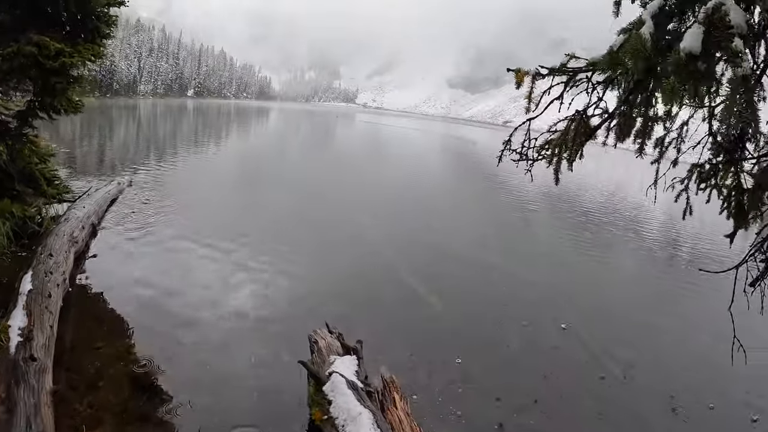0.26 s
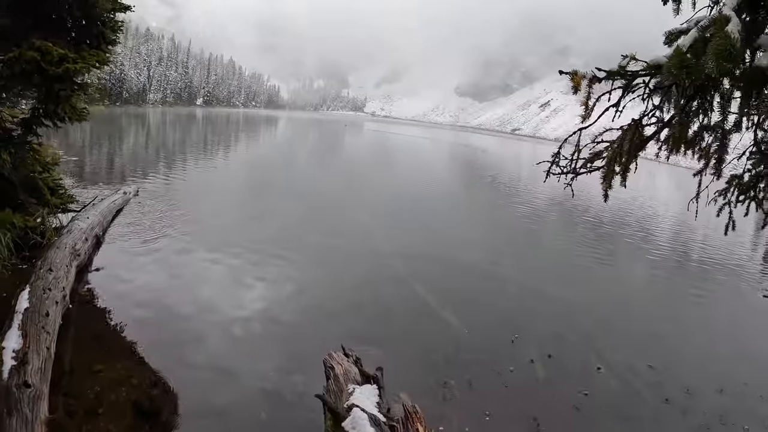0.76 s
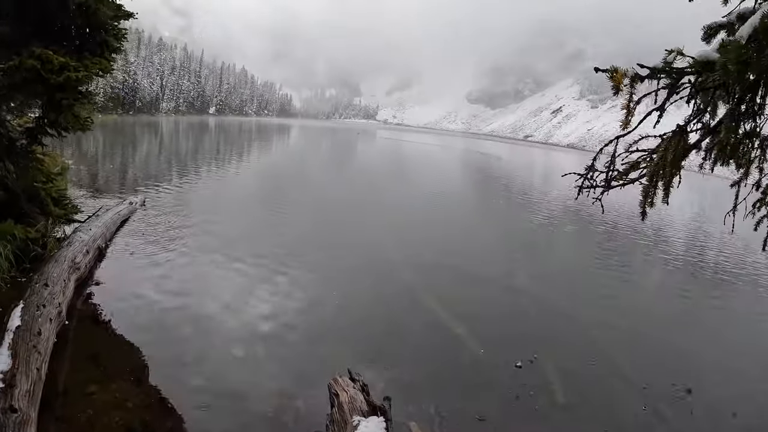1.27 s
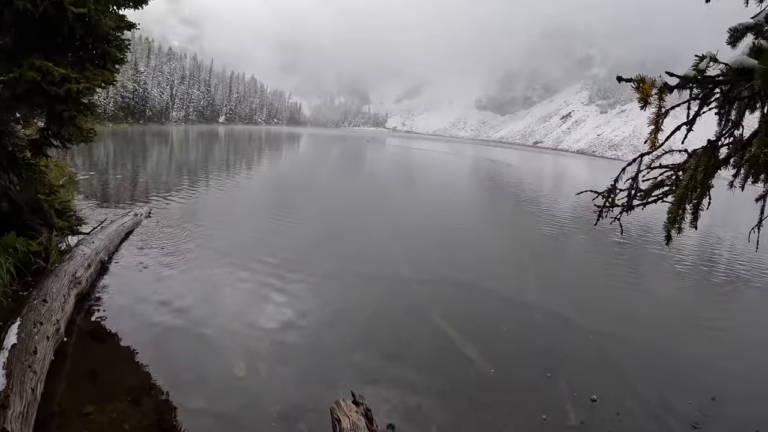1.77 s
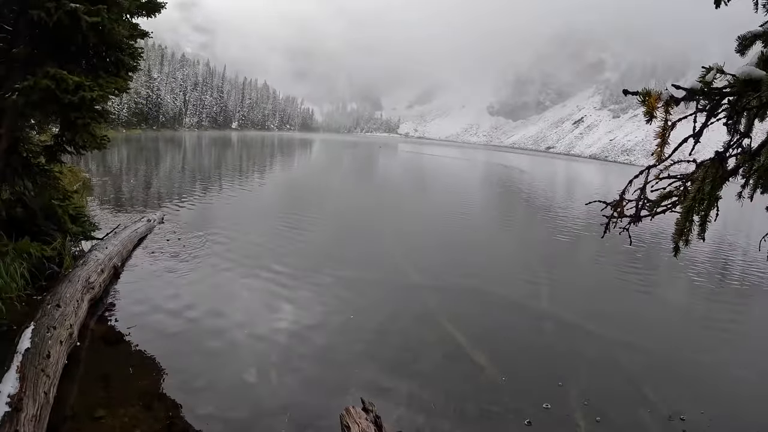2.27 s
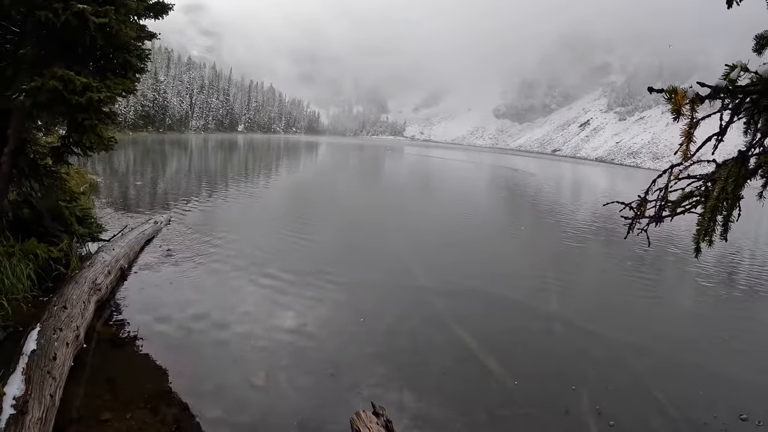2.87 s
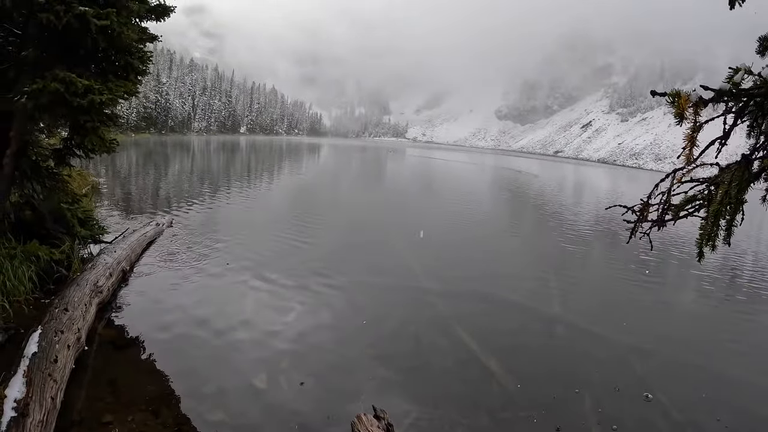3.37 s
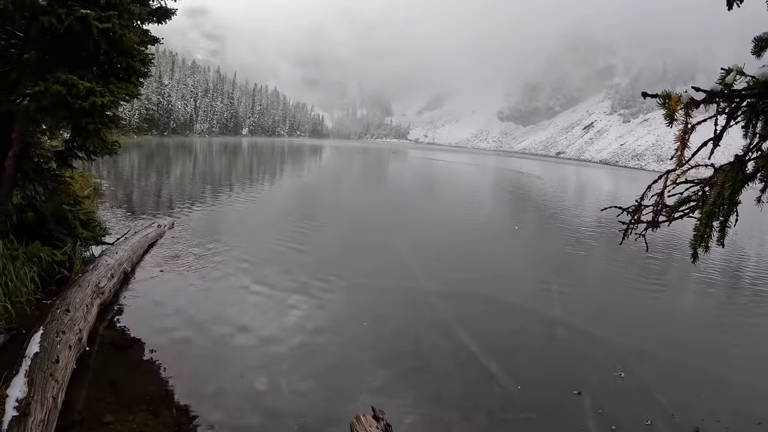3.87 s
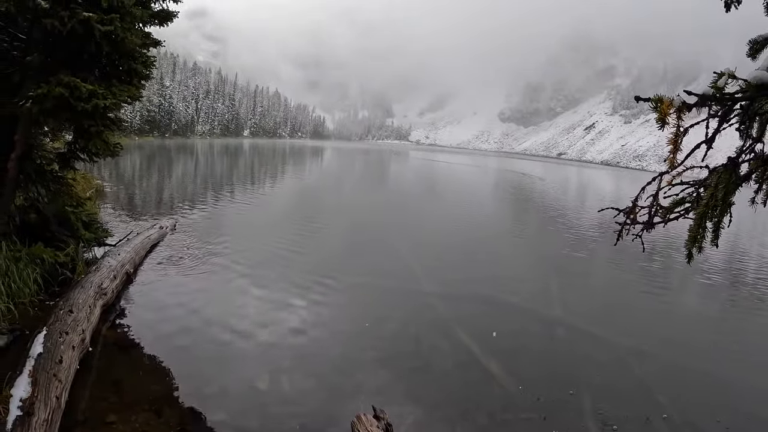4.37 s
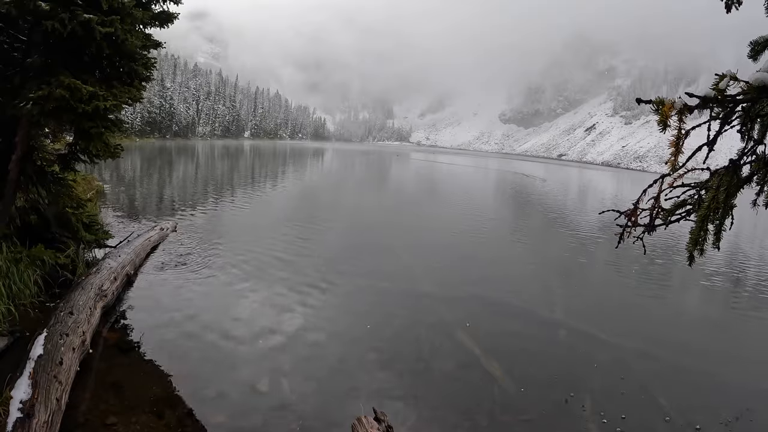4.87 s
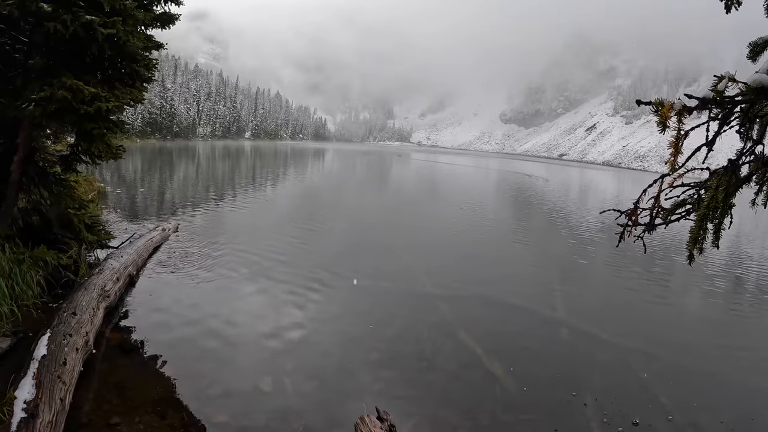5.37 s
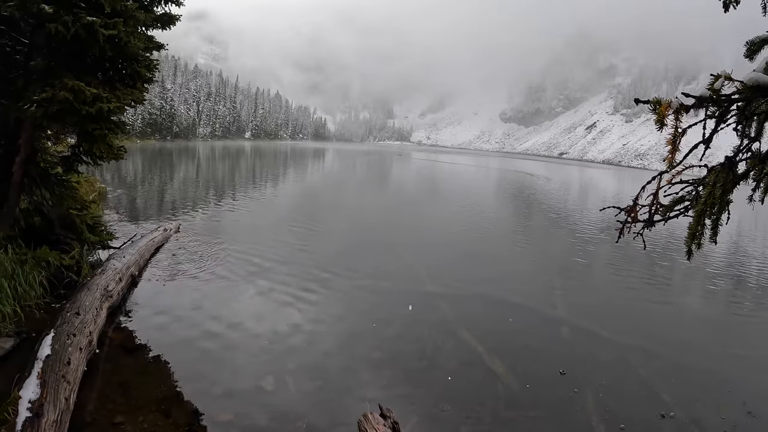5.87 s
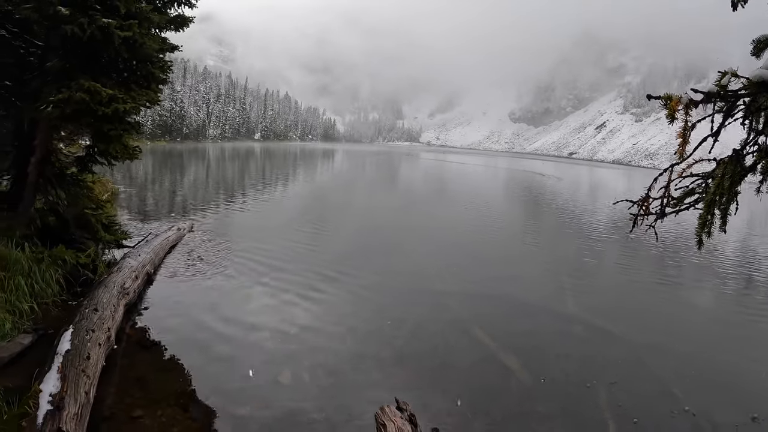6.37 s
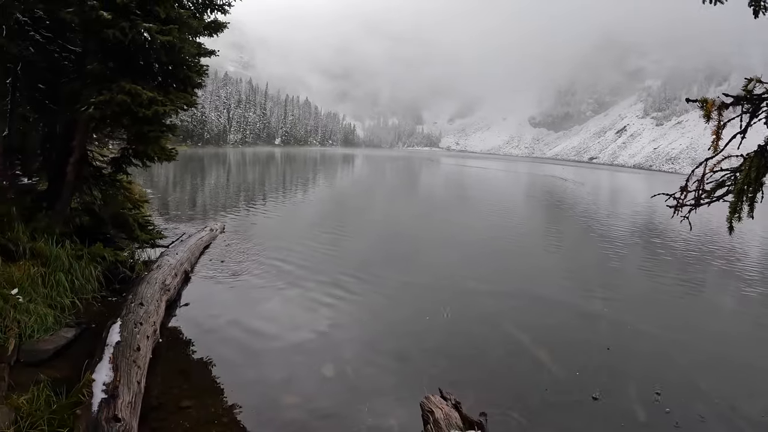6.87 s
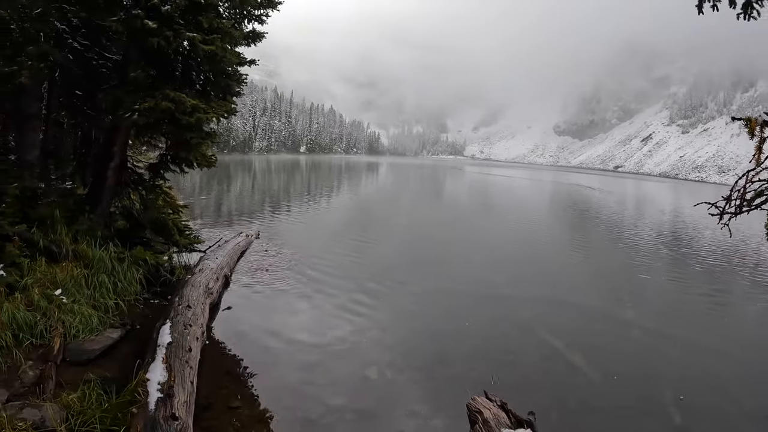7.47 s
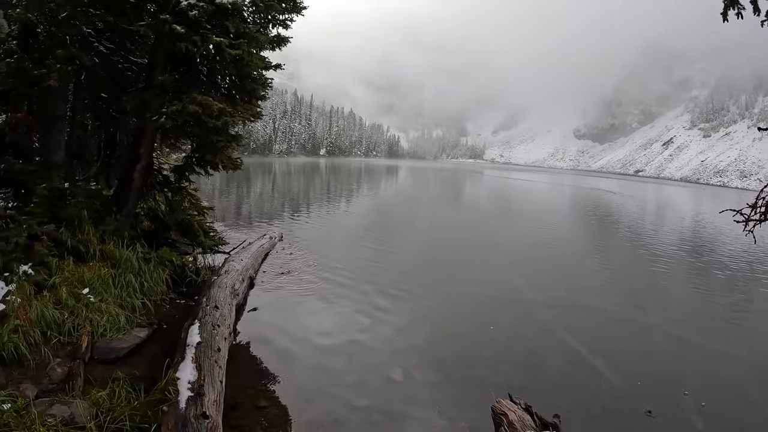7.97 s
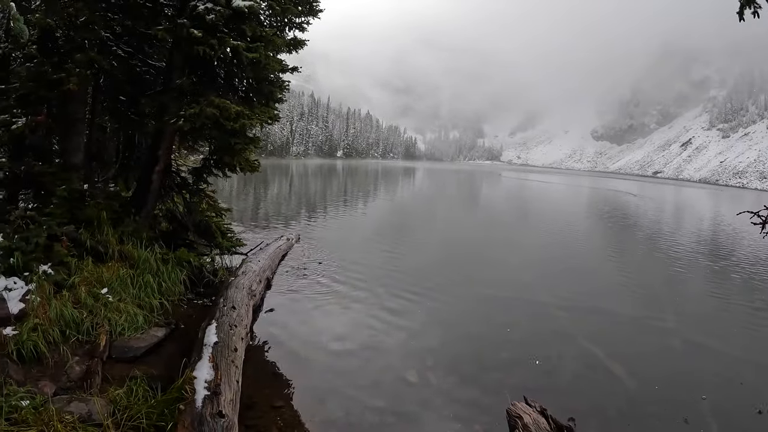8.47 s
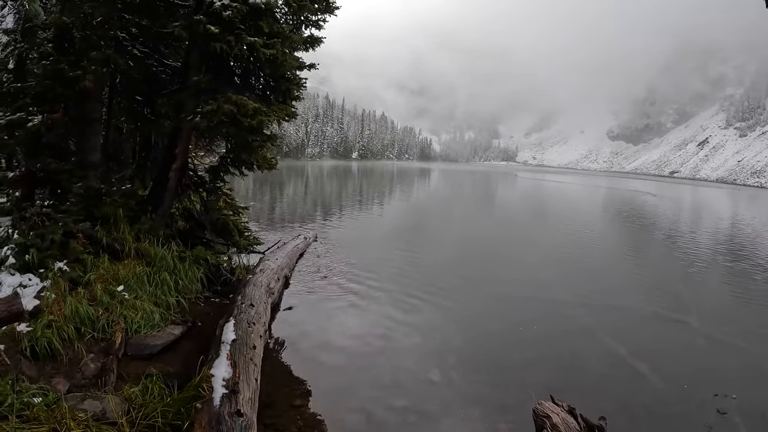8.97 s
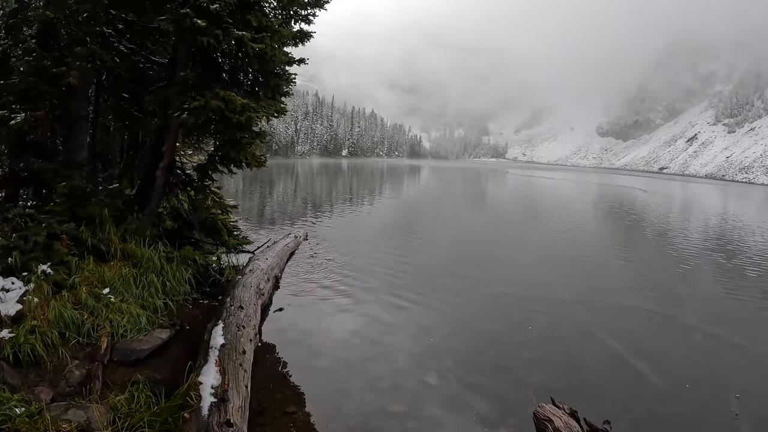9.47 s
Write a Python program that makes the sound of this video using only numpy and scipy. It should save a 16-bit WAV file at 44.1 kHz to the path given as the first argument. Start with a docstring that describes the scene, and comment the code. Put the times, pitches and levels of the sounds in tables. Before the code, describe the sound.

Snowmelt drips irregularly into shallow lake water, ticking and plinking on all sides, while a jacket rustles close by and a crow-like bird rasps faintly.

```python
"""Melt water drips from snowy branches by a shallow lake: drops tick around us, and trap bubbles that plink.
Bubbles are fading sine tones; ticks, and pats on a jacket, are mainly short bursts of noise.
The jacket swishes close by in grainy noise, and a few soft thuds come from the hand-held camera.
A crow-like bird rasps three times from the trees, as pulses ringing a throat.
Behind it all lie many weak plinks, a faint steady hiss and a low hum, both made from noise."""
import sys
import numpy as np
from scipy import signal
from scipy.fft import rfft, irfft, next_fast_len
from scipy.io import wavfile
from scipy.ndimage import uniform_filter1d

SR = 44100
rng = np.random.default_rng(int(sys.argv[2]) if len(sys.argv) > 2 else 0)


def unload_audio(sound):
    """Save the sound as a 16-bit wav file, at the path given as the first command line argument."""
    columns = np.transpose(np.atleast_2d(sound))
    # keep every value between -1 and 1, then stretch to whole-number steps
    steps = np.round(np.clip(columns, -1, 1) * 32767)
    wavfile.write(sys.argv[1], SR, steps.astype(np.int16))


N = 428652
TIME = np.arange(N) / SR  # [s]

# places, as left minus right [dB]: under the left trees, ahead, under the right branch, close on the left
LEFT, AHEAD, RIGHT, CLOSE = 2.8, -.5, -3.5, 26

# faint background, hiss of distant dripping over a low hum near 190 Hz from the camera:
# (frequency [Hz], relative level [dB])
BACKGROUND_SPECTRUM = [(60, -19), (100, -13), (190, 6.5), (300, -8), (750, -15.5), (1500, -6), (2600, -34),
                       (4200, -12), (7200, -1.5), (8300, -7), (15000, -13)]

# bird calls: (time [s], length [s], level [dB], base pitch [Hz])
BIRD_CALLS = [(2.608, 0.13, -49.5, 544), (5.515, 0.13, -48.5, 540.3), (7.822, 0.1004, -60, 502)]
# resonances of the bird's throat at CALL_HZ: (centre [Hz], width [Hz], level [dB])
THROAT_RESONANCES = [(576, 140, -20), (975, 200, -15), (1710, 160, -4), (2090, 340, 1), (3140, 1240, -17)]
CALL_HZ = 528  # usual pitch of a call; the resonances move up and down with the pitch
WARBLE_HZ = 52.6  # typical flutter rate of the throat, before it wanders

# the jacket's steady rustle as its wearer turns, stands still and turns again: (time [s], swish level [dB])
STEADY_RUSTLE = [(0, -58), (0.75, -61.5), (1.15, -70), (1.7, -60.5), (2.2, -73), (2.9, -80.5), (5.7, -80.5),
                 (6.1, -64.5), (6.8, -66.5), (7.1, -76.5), (7.35, -68.5), (7.7, -81.5), (8.4, -66),
                 (8.65, -71), (9.1, -60), (9.72, -59.5)]
RUSTLE_RUB_DB = -5.5  # the low rub in the steady rustle, set against its swish
# single sleeve strokes: (time of the peak [s], swish level [dB], low rub level [dB], rise [s], fall [s])
SLEEVE_STROKES = [(0.117, -40.5, -54, 0.13, 0.18), (0.32, -56, -45, 0.031, 0.075),
                  (0.91, -54.5, -44.5, 0.072, 0.12), (1.25, -58, -62, 0.071, 0.074),
                  (6.245, -56.5, -60, 0.19, 0.098), (6.59, -58, -91, 0.11, 0.2),
                  (6.955, -60, -62.5, 0.51, 0.24), (8.05, -64, -67, 0.12, 0.22),
                  (8.39, -67, -95, 0.39, 0.5), (8.51, -58.5, -68, 0.15, 0.099),
                  (9.18, -48, -54.5, 0.1, 0.25), (9.33, -82, -51.5, 0.22, 0.21),
                  (9.498, -40, -64, 0.13, 0.23), (9.679, -40.5, -67, 0.094, 0.21)]
# a stroke climbs by this depth over its rise and sinks as far over its fall; rounding 1 = pointed, 2 = round
STROKE_DEPTH_DB, STROKE_ROUNDING = 28, 1.91
# colour of the sliding cloth: (frequency [Hz], relative level [dB])
SWISH_SPECTRUM = [(400, -12.5), (700, -13.5), (1300, -3.5), (2400, 3), (4500, 2), (7200, -0.5), (8500, -13),
                  (14000, -48)]
# colour of the low rub: (frequency [Hz], relative level [dB])
RUB_SPECTRUM = [(25, -15), (90, -16), (195, 6.5), (290, -3), (520, -5.5), (900, -22), (1600, -44.5)]

# soft knocks on the camera: (time [s], level [dB], pitch [Hz])
CAMERA_KNOCKS = [(0.049, -38.5, 207), (0.305, -36, 204), (0.83, -29.5, 208), (0.89, -39.5, 287),
                 (0.903, -37, 322), (0.938, -42, 147), (1.684, -37.5, 398), (1.795, -40.5, 181),
                 (5.922, -57.5, 112), (6.282, -50, 364), (6.993, -44.5, 506), (8.286, -53, 167),
                 (8.513, -49, 576), (8.978, -39, 205), (9.207, -40, 565), (9.586, -40.5, 167)]
KNOCK_MS, KNOCK_HZ = 2.98, 200  # fading time of a knock at this pitch; higher knocks are shorter

# drops that pat on the jacket: (time [s], level [dB], place as left minus right [dB])
JACKET_PATS = [(0.121, -21.5, LEFT), (1.287, -26.5, CLOSE), (1.344, -23, CLOSE), (2.012, -35, CLOSE),
               (2.682, -25.5, LEFT), (6.967, -26.5, CLOSE), (9.116, -34, CLOSE)]
# the smack of the fabric, and the thump of the padding under it
PAT_HZ, PAT_THUMP_HZ, PAT_THUMP_DB = 1930, 565, -11

# drops that tick on water, wood or cloth, some close by on jacket or camera:
# (time [s], level [dB], centre [Hz], place as left minus right [dB])
IMPACT_TICKS = [(0.502, -39, 3830, RIGHT), (0.532, -36.5, 6100, LEFT), (0.653, -40, 4620, CLOSE),
                (0.702, -41, 1420, LEFT), (1.03, -41.5, 1230, CLOSE), (1.113, -45.5, 880, CLOSE),
                (1.333, -38.5, 6540, RIGHT), (1.439, -37.5, 7000, LEFT), (1.4534, -29, 6860, LEFT),
                (1.803, -43, 1630, AHEAD), (1.873, -34.5, 5060, LEFT), (1.94, -37, 2110, AHEAD),
                (2.053, -39, 5650, LEFT), (2.104, -34, 5800, LEFT), (2.287, -40, 6260, CLOSE),
                (2.328, -42, 3850, RIGHT), (2.341, -39, 4920, RIGHT), (2.415, -37, 3550, AHEAD),
                (2.674, -43.5, 6740, LEFT), (2.802, -39, 6240, LEFT), (2.815, -35, 5000, LEFT),
                (3.26, -40, 7350, LEFT), (3.724, -40.5, 4950, LEFT), (3.789, -42, 5340, RIGHT),
                (3.829, -36, 4280, AHEAD), (4.158, -35, 5550, LEFT), (4.517, -39, 3780, RIGHT),
                (4.662, -33.5, 5600, LEFT), (5.015, -43.5, 6520, LEFT), (5.042, -37.5, 5300, RIGHT),
                (5.125, -37.5, 5070, RIGHT), (5.142, -40.5, 4540, RIGHT), (5.176, -43.5, 4300, RIGHT),
                (5.24, -41.5, 7250, AHEAD), (5.277, -37, 5730, AHEAD), (5.512, -37.5, 5480, RIGHT),
                (5.831, -39, 6130, CLOSE), (5.93, -44.5, 5930, LEFT), (6.012, -42, 4900, RIGHT),
                (6.072, -41.5, 4230, LEFT), (6.232, -36, 1610, CLOSE), (6.242, -30.5, 1850, LEFT),
                (6.328, -41, 3760, RIGHT), (6.567, -35.5, 7560, LEFT), (6.597, -39.5, 6770, CLOSE),
                (6.661, -39.5, 5970, RIGHT), (6.765, -38.5, 3120, RIGHT), (6.797, -45, 2210, CLOSE),
                (6.949, -35.5, 6030, AHEAD), (7.169, -37, 5400, LEFT), (7.237, -39, 4800, LEFT),
                (7.2457, -30, 5140, LEFT), (7.272, -42, 6900, RIGHT), (7.43, -41, 1730, CLOSE),
                (8.351, -42, 6330, LEFT), (8.391, -39, 3800, LEFT), (8.493, -33.5, 3520, RIGHT),
                (8.512, -35.5, 6240, LEFT), (8.522, -40, 4700, LEFT), (8.782, -35, 4800, LEFT),
                (8.785, -39, 6250, RIGHT), (8.799, -39.5, 6600, LEFT), (8.983, -35, 4050, AHEAD),
                (9.139, -39.5, 4900, RIGHT), (9.222, -33.5, 5250, LEFT)]
# drops that plop, each with its own shape:
# (time [s], level [dB], pitch [Hz], rise [ms], decay [ms], pitch climb [share per decay],
#  place as left minus right [dB])
WATER_PLOPS = [(0.009, -29, 1490, 1.3, 1, 0, LEFT), (0.31, -28, 2420, 0.24, 2.7, 0.0007, LEFT),
               (1.364, -37, 2140, 0.4, 5, 0.079, AHEAD), (1.428, -42, 997, 1.1, 12, 0, RIGHT),
               (2.563, -45.5, 1033, 2.1, 12, 0, RIGHT), (2.822, -45.5, 1866, 5.6, 7.3, 0.042, AHEAD),
               (3.308, -41, 569, 17, 4.3, 0.14, RIGHT), (4.471, -56, 1860, 4.6, 13, 0.052, RIGHT),
               (4.997, -36.5, 1875, 0.49, 5.8, 0.092, LEFT), (6.709, -38.5, 1460, 6.9, 3.4, 0.015, LEFT),
               (8.03, -55, 2030, 6, 9, 0.046, AHEAD), (8.781, -31, 1607, 1.3, 0.8, 0, AHEAD),
               (9.65, -35, 1906, 4, 2.8, 0.047, AHEAD), (9.683, -40.5, 970, 13, 12, 0.099, LEFT)]
# drops that trap a ringing bubble: (time [s], level [dB], pitch [Hz], place as left minus right [dB])
BUBBLE_DROPS = [(0.566, -40, 2620, AHEAD), (0.589, -39.5, 2100, RIGHT), (0.684, -29, 2680, LEFT),
                (0.76, -32.5, 5800, LEFT), (0.784, -47.5, 2430, LEFT), (0.849, -47, 1880, AHEAD),
                (0.9, -39.5, 3130, AHEAD), (0.951, -37, 6040, LEFT), (1.087, -48, 1200, LEFT),
                (1.189, -41, 3220, RIGHT), (1.336, -34, 3360, RIGHT), (1.396, -39.5, 3900, AHEAD),
                (1.504, -40, 3240, AHEAD), (1.514, -40.5, 3070, LEFT), (1.596, -34, 2980, AHEAD),
                (1.654, -35.5, 3680, AHEAD), (1.908, -44, 3400, AHEAD), (2.001, -43, 3630, AHEAD),
                (2.071, -47, 2070, AHEAD), (2.08, -39.5, 6900, RIGHT), (2.18, -38, 3240, RIGHT),
                (2.454, -42.5, 2020, AHEAD), (2.457, -39.5, 5220, LEFT), (2.558, -39, 4040, LEFT),
                (2.593, -42.5, 3260, RIGHT), (2.71, -40.5, 2890, RIGHT), (2.789, -38, 6370, LEFT),
                (2.852, -39, 5200, AHEAD), (2.911, -42, 4850, AHEAD), (3.194, -34, 3610, RIGHT),
                (3.253, -34.5, 2620, RIGHT), (3.32, -34, 6450, AHEAD), (3.369, -42.5, 3680, RIGHT),
                (3.451, -45.5, 3120, LEFT), (3.523, -46, 2260, RIGHT), (3.539, -44.5, 4670, LEFT),
                (3.699, -38.5, 2900, RIGHT), (3.81, -44.5, 3720, RIGHT), (3.86, -38, 6340, LEFT),
                (3.861, -41.5, 5000, AHEAD), (4.026, -49, 3570, AHEAD), (4.174, -43, 3250, LEFT),
                (4.428, -46.5, 3640, AHEAD), (4.542, -45.5, 4200, RIGHT), (4.575, -59, 933, AHEAD),
                (4.598, -39.5, 3480, LEFT), (4.711, -34, 6680, LEFT), (4.717, -47, 1377, RIGHT),
                (4.853, -40, 2620, RIGHT), (4.891, -36.5, 2950, RIGHT), (4.908, -40, 2430, RIGHT),
                (4.917, -44, 3320, RIGHT), (4.931, -39.5, 3100, RIGHT), (4.966, -40.5, 2930, LEFT),
                (4.984, -44, 3280, LEFT), (4.942, -44, 3120, RIGHT), (5.035, -30.5, 2230, RIGHT),
                (5.092, -45, 5370, RIGHT), (5.153, -39.5, 2400, RIGHT), (5.214, -47, 4950, AHEAD),
                (5.309, -44, 2930, RIGHT), (5.315, -38, 3220, RIGHT), (5.348, -48, 1460, RIGHT),
                (5.397, -41.5, 3330, RIGHT), (5.602, -32.5, 7230, LEFT), (5.633, -40.5, 2630, RIGHT),
                (5.654, -47, 3140, LEFT), (5.756, -38, 2560, RIGHT), (5.871, -37, 3060, RIGHT),
                (5.942, -44.5, 6640, LEFT), (6.004, -40.5, 6500, LEFT), (6.023, -32, 3310, RIGHT),
                (6.102, -42.5, 3430, RIGHT), (6.123, -43.5, 4800, AHEAD), (6.234, -32, 6580, LEFT),
                (6.266, -35, 4260, AHEAD), (6.274, -37.5, 4700, RIGHT), (6.284, -46, 2250, LEFT),
                (6.371, -33, 6720, LEFT), (6.395, -37, 3360, RIGHT), (6.448, -38.5, 8660, LEFT),
                (6.663, -39.5, 3570, RIGHT), (6.809, -36, 6600, RIGHT), (7.135, -39, 6200, AHEAD),
                (7.157, -44, 2066, AHEAD), (7.409, -47.5, 2130, LEFT), (7.516, -44, 3230, RIGHT),
                (7.603, -45.5, 3010, RIGHT), (7.657, -42, 4020, LEFT), (8.116, -44, 4270, AHEAD),
                (8.375, -47, 4550, LEFT), (8.379, -42.5, 3200, LEFT), (8.447, -42.5, 3520, AHEAD),
                (8.663, -42, 4060, RIGHT), (8.682, -42.5, 3360, RIGHT), (8.841, -39, 3650, RIGHT),
                (8.915, -48, 2370, RIGHT), (9.027, -40, 4460, LEFT), (9.045, -38, 2470, LEFT),
                (9.066, -40.5, 2900, AHEAD), (9.074, -36, 2210, AHEAD)]
# a bubble of RING_HZ decays in RING_MS; smaller ones die faster, by this power of the pitch
RING_MS, RING_HZ, RING_LAW = 9.9, 920, 1.354

# overall treble colour, the sound thins out above 10 kHz: (frequency [Hz], level [dB])
TREBLE_COLOUR = [(7300, 3), (8300, -3.5), (10200, -2), (11200, -13.5), (12200, -5), (13000, -24),
                 (14500, -12)]
TOP_HZ = 15000  # nearly nothing passes above this


def undb(db):
    """Turn decibels into gain."""
    return 10 ** (np.asarray(db) / 20)


def unit(x):
    """Scale to an average strength (rms) of 1."""
    return x / np.sqrt(np.mean(x ** 2))


def band_pass(x, edges):
    """Keep only the frequencies between two edges [Hz]."""
    return signal.sosfilt(signal.butter(2, edges, "band", fs=SR, output="sos"), x)


def colour(x, points):
    """Shape the tone by a curve of (frequency [Hz], level [dB]) points."""
    hz, db = np.transpose(points)
    size = next_fast_len(N + SR // 10)
    f = np.fft.rfftfreq(size, 1 / SR) + 1
    gain = undb(np.interp(np.log(f), np.log(hz), db))
    return irfft(rfft(x, size) * gain, size)[..., :N]


def walk(rate, size=N):
    """A smooth random wander around 0 with a spread near 1; a higher rate wanders faster."""
    k = max(int(SR / rate), 2)
    steps = np.repeat(rng.standard_normal(size // k + 1), k)
    return 1.37 * uniform_filter1d(uniform_filter1d(steps, k), k)[:size]


def pair(side_db):
    """Stereo noise: a part shared by both ears and a part that differs between them."""
    mid, side = rng.standard_normal((2, N))
    return mid + undb(side_db) * np.array([side, -side])


def add(out, s, sound, pan_db=0):
    """Mix a short sound in at time s; the farther side hears it weaker and, if clearly weaker, a sample later."""
    gains = undb(np.array([pan_db, -pan_db]) / 2)
    for channel, gain in enumerate(unit(gains)):
        start = max(int(s * SR), 0) + int(gains[channel] < .85)
        part = sound[:max(N - start, 0)]
        out[channel, start:start + len(part)] += gain * part


def ring(hz, decay_ms, rise_ms, glide=0, start=0):
    """A fading tone: its pitch begins high by the share start, settles, and climbs by glide per decay time."""
    decay_ms = max(decay_ms, .2)
    ms = np.arange(int(SR * decay_ms * 8 / 1000)) * 1000 / SR
    swell = (1 - np.exp(-ms / rise_ms)) ** 2 * np.exp(-ms / decay_ms)
    pitch = hz * (1 + glide * ms / decay_ms + start * np.exp(-ms / rise_ms))
    return swell / swell.max() * np.sin(2 * np.pi * np.cumsum(pitch) / SR)


def smack(hz, octaves, decay_ms, spray_db, spray_ms):
    """A sharp noise burst, reaching some octaves either side of hz, with a weak tail of spray; peak 1."""
    ms = np.arange(3072) * 1000 / SR
    fade = np.exp(-ms / decay_ms) + undb(spray_db) * np.exp(-ms / spray_ms)
    onset = np.minimum(2 * ms, 1)
    burst = rng.standard_normal(len(ms)) * fade * onset
    edges = np.clip([hz / 2 ** octaves, hz * 2 ** octaves], 20, .45 * SR)
    sound = band_pass(burst, edges)
    return sound / np.abs(sound).max()


def trees(x, db, t60, build_up):
    """Trunks and banks scatter a thin tail, different in each ear; it builds up, then falls 60 dB per t60 [s]."""
    t = np.arange(int(SR * .6)) / SR
    noise = rng.standard_normal((2, len(t)))
    # uneven levels keep the tail thin
    fade = undb(6.0 * rng.standard_normal(len(t)) - 60 * t / t60)
    tail = noise * fade * (1 - np.exp(-t / build_up))
    tail /= np.sqrt(np.sum(tail ** 2, axis=1, keepdims=True))
    return undb(db) * signal.fftconvolve(x.mean(axis=0)[None], tail, axes=1)[:, :N]


def background():
    """Hiss of distant dripping, over a low hum near 190 Hz from the camera: noise with a wavering level."""
    waver = undb(0.44 * walk(7.8))
    return undb(-75.5) * unit(colour(pair(side_db=-4.5) * waver, BACKGROUND_SPECTRUM))


def far_drops(count=560):
    """Weaker drops along the shore; large bubbles are rare and distant, ring longer and chirp upwards more."""
    out = np.zeros((2, N))
    for when, size, loud, side in rng.random((count, 4)):
        hz = 8300 * np.exp(-1.25 * size - .8 * size ** 8)
        db = -65 + 12 * loud ** 2 - 12 * size ** 4
        plink = ring(hz, (4300 / hz) ** 1.4, rise_ms=.9, glide=.05 * size, start=.1)
        add(out, when * N / SR, undb(db) * plink, 12 * (side - .5))
    return out


def bird_call(length, db, hz):
    """One harsh call: uneven pulses and rasping breath ring the throat, with a fast warble."""
    t = np.arange(int(length * SR)) / SR
    arch = np.sin(np.pi * t / length)
    warble = np.sin(2 * np.pi * WARBLE_HZ * t + walk(70, len(t)))
    # the pitch jitters and sags towards the end
    pitch = hz * (1 - .07 * (t / length - .5) + .028 * walk(500, len(t)))
    phase = 2 * np.pi * np.cumsum(pitch) / SR
    pulses = unit(sum(np.cos(k * phase) for k in range(1, 11)))
    # rasp grows towards the middle of the call and pulses with the voice
    rasp = .4 * arch ** 2 * rng.standard_normal(len(t)) * (1 + np.cos(phase))
    source = pulses + rasp
    voice = 0
    for centre, width, gain_db in np.multiply(THROAT_RESONANCES, [hz / CALL_HZ, 1, 1]):
        voice = voice + undb(gain_db) * band_pass(source, [centre - width / 2, centre + width / 2])
    flutter = undb(2.5 * warble + 1.5 * walk(200, len(t)))
    call = undb(db) * unit(voice * arch ** .9 * flutter)
    # the beak opens and closes and the throat flutters, swinging pitch and resonances together
    speed = 1 + .12 * (arch - .75) + .085 * warble
    return np.interp(np.cumsum(speed) / SR, t, call)


def bird():
    """The calls reach the shore by two paths, the second later and weaker."""
    out = np.zeros((2, N))
    for s, length, db, hz in BIRD_CALLS:
        call = bird_call(length, db, hz)
        add(out, s, call, pan_db=-3.5)
        add(out, s + .0065, undb(-9) * call)
    return out


def sliding():
    """Levels [dB] that drive the swish and low rub: steady rustle plus strokes that swell and fade."""
    rustle_db = np.interp(TIME, *np.transpose(STEADY_RUSTLE))
    power = undb([rustle_db, rustle_db + RUSTLE_RUB_DB]) ** 2
    for s, swish_db, rub_db, rise, fall in SLEEVE_STROKES:
        # distance from the peak, counted in rises or falls
        away = np.clip(np.maximum((s - TIME) / rise, (TIME - s) / fall), 0, 4)
        shape = undb(-STROKE_DEPTH_DB * away ** STROKE_ROUNDING)
        power = power + np.outer(undb([swish_db, rub_db]), shape) ** 2
    return 10 * np.log10(power)


def jacket(swish_db, rub_db):
    """Cloth slides in tiny slips: a grainy swish, stronger on the left, and a low rub through the camera body."""
    # slow sliding crackles; fast sliding merges into a smoother swish
    grain_db = np.interp(swish_db, [-58, -42], [6, 2.5])
    # the whole sleeve catches and lets go, which clumps the slips
    catching = undb(1.5 * walk(90))
    cloth = 0
    for hz in 320 * np.sqrt(2) ** np.arange(12):
        # folds of each size slip on their own, the small ones faster
        wander = walk(6 * np.sqrt(hz)) + .35 * walk(60)
        slips = undb(grain_db * wander - grain_db ** 2 / 8)
        cloth = cloth + band_pass(pair(side_db=-8.0) * slips * catching, [hz, np.sqrt(2) * hz])
    swish = unit(colour(cloth, SWISH_SPECTRUM)) * undb(swish_db - 2)
    # the left side hears more of the cloth, by these (frequency [Hz], level [dB]) points
    swish[0] = colour(swish[0], [(1100, 11.2), (2500, 3.57), (7300, 1.26), (12000, 30)])
    rough = pair(side_db=-12.5) * undb(2.28 * walk(80))
    rub = unit(colour(rough, RUB_SPECTRUM)) * undb(rub_db - 5.0)
    return swish + rub


def creases(swish_db, count=1000):
    """Folds of the jacket snap over with tiny knocks, louder with faster cloth up to a limit."""
    out = np.zeros((2, N))
    for when, size, loud in rng.random((count, 3)):
        hz = 5500 * np.exp(-2.3 * size)
        # past this limit the swish swallows the knocks
        db = min(swish_db[int(when * N)], -51) - 6.0 + 20 * loud ** 3 - 10 * size
        # the low knocks come through the body and lie farther left
        add(out, when * N / SR, undb(db) * ring(hz, 2400 / hz, rise_ms=0.9), 10 * size)
    return out


def knock(out, s, db, hz, pan_db=0):
    """A blunt knock: a tone that dies within a few cycles, over a weaker noise burst."""
    decay_ms = KNOCK_MS * np.sqrt(KNOCK_HZ / hz)
    add(out, s, undb(db) * ring(hz, decay_ms, rise_ms=decay_ms), pan_db)
    burst = smack(hz, octaves=0.73, decay_ms=22.4, spray_db=-8.5, spray_ms=11.0)
    add(out, s, undb(db - 9.5) * burst, pan_db)


def thuds():
    """Knocks on the camera, and the thump of the padding under each drop on the jacket."""
    out = np.zeros((2, N))
    for s, db, hz in CAMERA_KNOCKS:
        knock(out, s, db, hz)
    for s, db, pan_db in JACKET_PATS:
        knock(out, s, db + PAT_THUMP_DB, PAT_THUMP_HZ, pan_db / 2)
    return out


def pats(out):
    """Drops on taut fabric give one dead snap that does not ring."""
    for s, db, pan_db in JACKET_PATS:
        snap = smack(PAT_HZ, octaves=1.08, decay_ms=1.0, spray_db=-25, spray_ms=14)
        add(out, s, undb(db) * snap, pan_db)


def splash(out, s, db, hz, pan_db, count=8):
    """Droplets thrown up by an impact fall back as tiny plinks, near the pitch of the drop itself."""
    for wait, size, loud, side in rng.random((count, 4)):
        own_hz = min(hz * 2 ** (1.2 * size - .6), 8000)
        plink = undb(db - 8.5 - 40.7 * loud) * ring(own_hz, 3800 / own_hz, rise_ms=0.64)
        add(out, s + 0.069 * wait ** 2, plink, pan_db / 2 + 10 * (side - .5))


def ticks(out):
    """Drops tick on water, wood or cloth: a noise burst, a brief ring at its centre, and thrown droplets."""
    for s, db, hz, pan_db in IMPACT_TICKS:
        # dull ticks spread over more octaves than bright ones
        spread = min(1750 / hz, 1)
        body = smack(hz, octaves=spread, decay_ms=1.0, spray_db=-20.5, spray_ms=11.0)
        add(out, s, undb(db + 3.0) * body, pan_db)
        # the first contact cracks over the whole treble
        crack = smack(9000, octaves=1, decay_ms=.5, spray_db=-20, spray_ms=10)
        add(out, s, undb(db - 15) * crack, pan_db)
        brief_ring = ring(hz, decay_ms=0.43, rise_ms=0.9, start=0.14)
        add(out, s, undb(db + 0.5) * brief_ring, pan_db)
        splash(out, s, db, hz, pan_db)


def plops(out):
    """Drops that ring as one plain tone, each with its own rise, decay and upward glide."""
    for s, db, hz, rise_ms, decay_ms, glide, pan_db in WATER_PLOPS:
        add(out, s, undb(db) * ring(hz, decay_ms, rise_ms, glide), pan_db)


def bubbles(out):
    """A trapped bubble pinches off and rings, over the weaker splash of the impact and its droplets."""
    for s, db, hz, pan_db in BUBBLE_DROPS:
        decay_ms = RING_MS * (RING_HZ / hz) ** RING_LAW
        plink = ring(hz, decay_ms, rise_ms=0.43, glide=0.028 * rng.random(), start=0.23)
        add(out, s, undb(db) * plink, pan_db)
        impact = smack(hz * 1.12, octaves=.35, decay_ms=1.8, spray_db=-11, spray_ms=20)
        add(out, s, undb(db - 14) * impact, pan_db)
        splash(out, s, db, hz, pan_db)


def drops():
    """All the near drops: pats, ticks, plops and ringing bubbles."""
    out = np.zeros((2, N))
    pats(out)
    ticks(out)
    plops(out)
    bubbles(out)
    return out


def scene():
    """Drops with a short tail, the bird with a longer one, the jacket and camera close by, and the background."""
    all_drops, calls = drops() + far_drops(), bird()
    echoes = trees(all_drops, db=-10.0, t60=0.11, build_up=0.0012)
    echoes += trees(calls, db=-8.5, t60=.3, build_up=.025)
    swish_db, rub_db = sliding()
    handling = jacket(swish_db, rub_db) + creases(swish_db) + thuds()
    return background() + all_drops + calls + echoes + handling


def record(dry):
    """Colour the overall treble, which thins out above 10 kHz, and cut the top."""
    low_pass = signal.ellip(8, .2, 70, TOP_HZ, fs=SR, output="sos")
    return signal.sosfilt(low_pass, colour(dry, TREBLE_COLOUR))


dry = scene()
out = record(dry)
unload_audio(out)
```